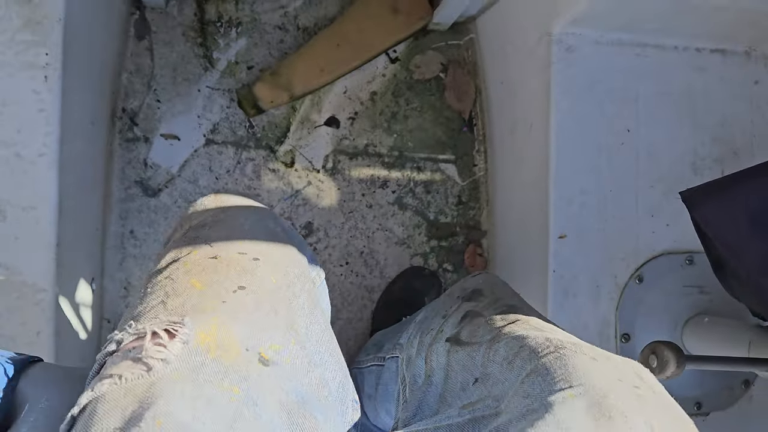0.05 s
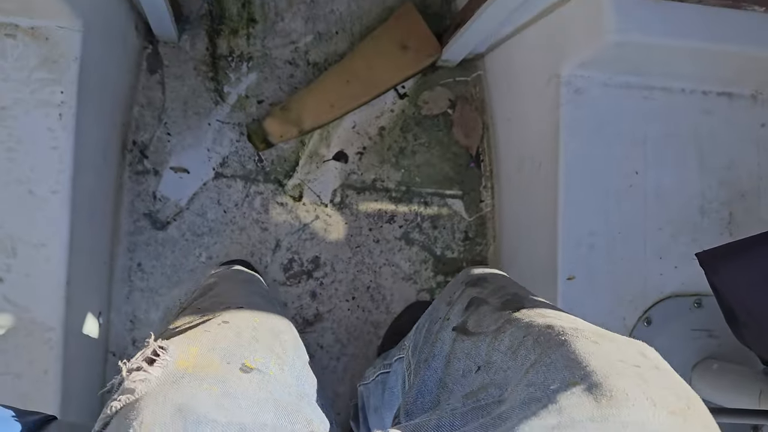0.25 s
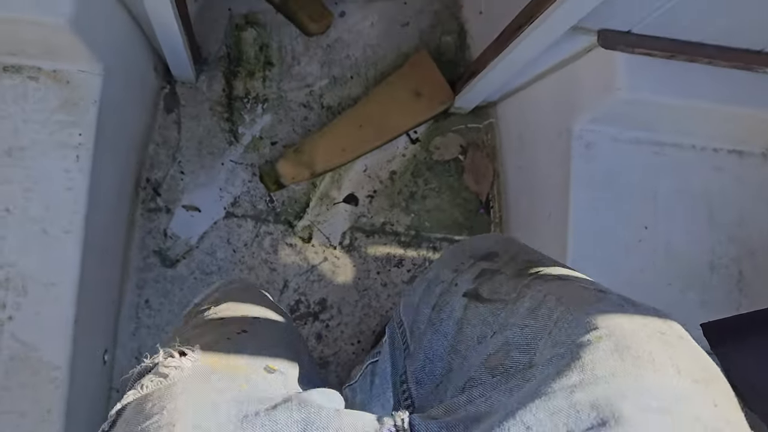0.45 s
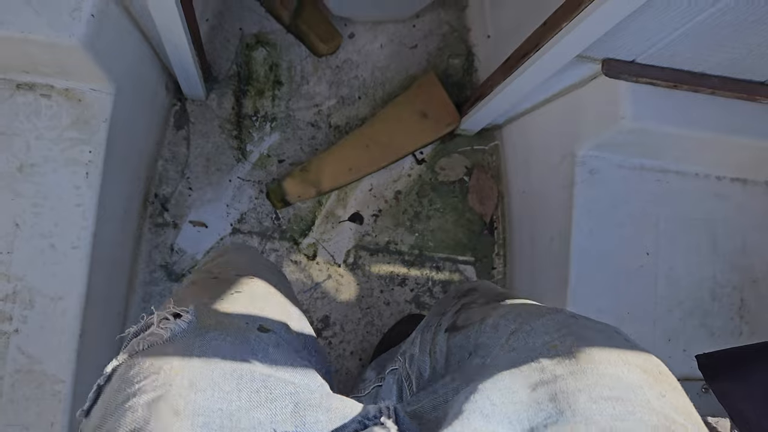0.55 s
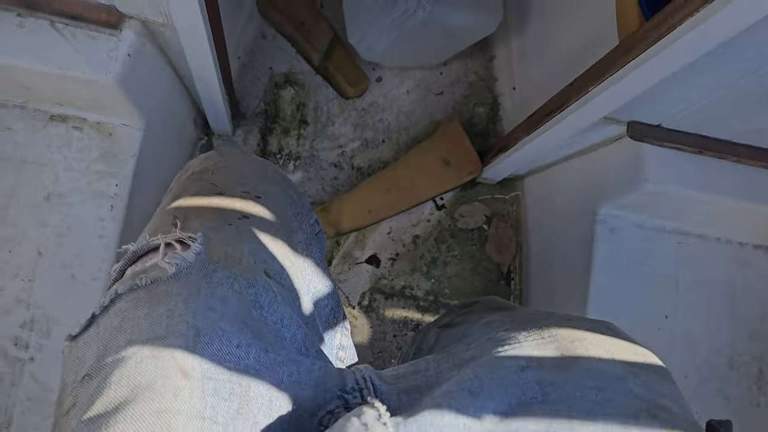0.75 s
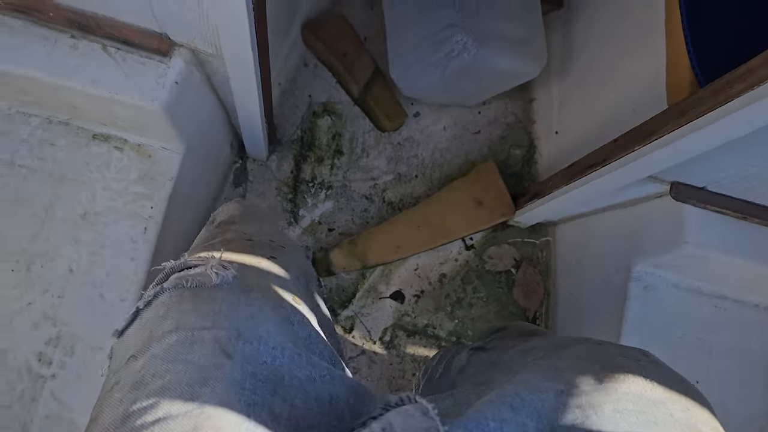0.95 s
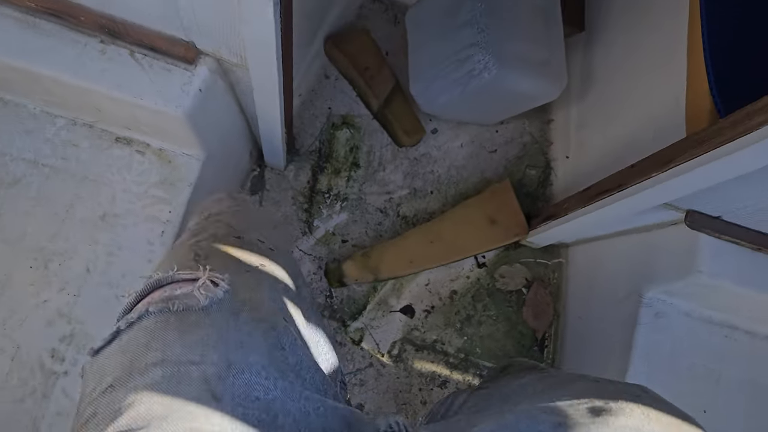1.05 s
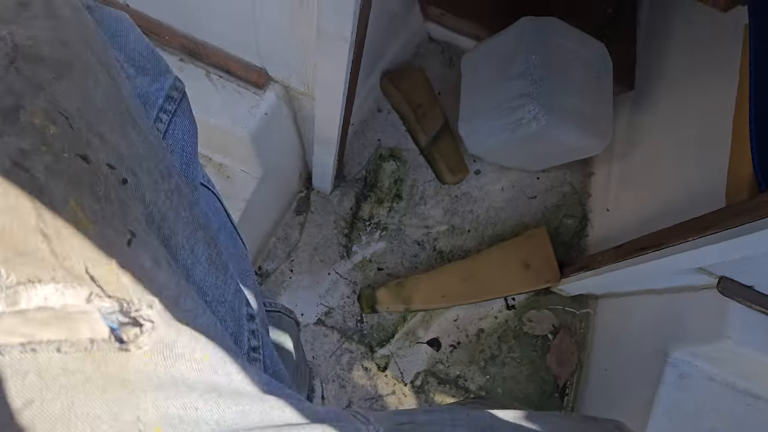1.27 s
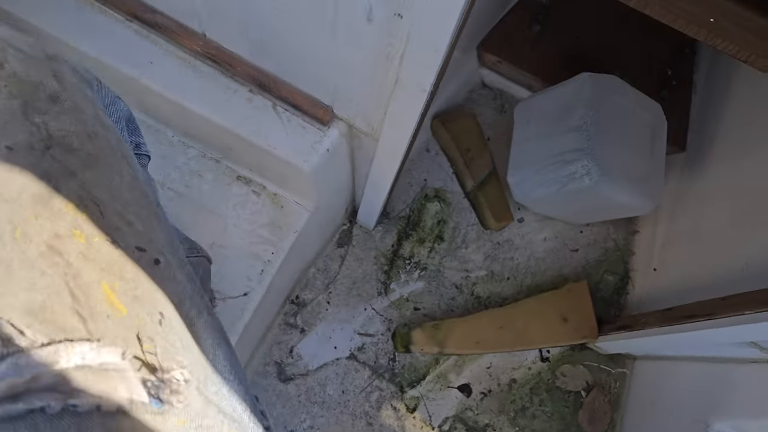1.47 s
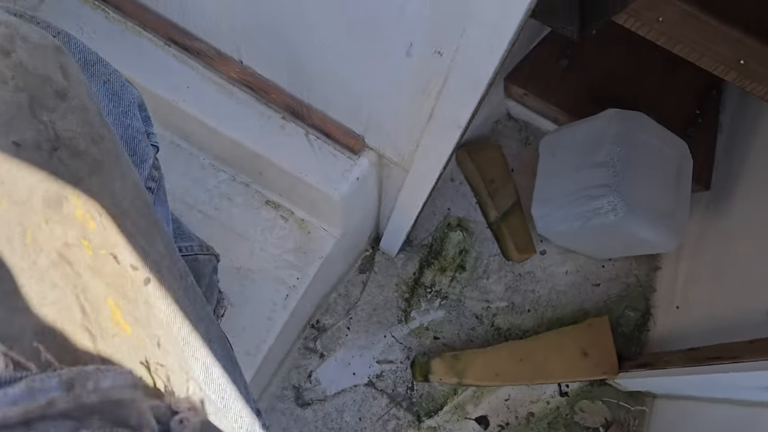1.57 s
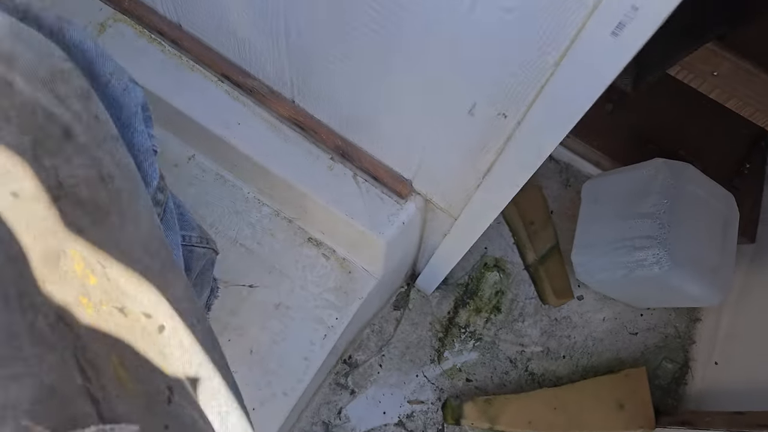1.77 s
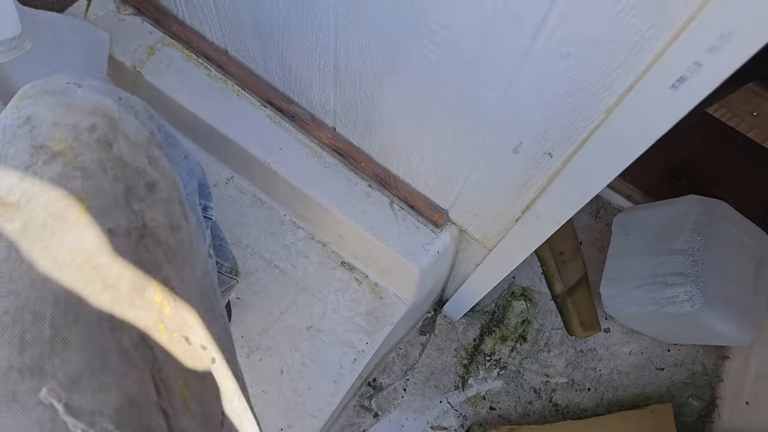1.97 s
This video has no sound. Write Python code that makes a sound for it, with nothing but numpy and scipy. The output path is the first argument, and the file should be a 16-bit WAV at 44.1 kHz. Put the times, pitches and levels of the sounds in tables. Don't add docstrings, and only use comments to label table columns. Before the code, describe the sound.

Five heavy footsteps on a thin, drum-like boat floor outdoors, the first three loudest and evenly spaced, the last two softer after a short gap, with faint cloth rustle and low hull rumble, close stereo microphone slightly overloaded.

```python
import sys
import numpy as np
from scipy import signal
from scipy.fft import rfft, irfft
from scipy.io import wavfile
from scipy.ndimage import uniform_filter1d

SR = 44100
rng = np.random.default_rng(int(sys.argv[2]) if len(sys.argv) > 2 else 0)


def wrap_up_sound(samples):
    columns = np.atleast_2d(samples).T
    tamed = np.clip(columns, -1, 1)
    steps = np.round(tamed * 32767).astype(np.int16)
    wavfile.write(sys.argv[1], SR, steps)


def magnitude_from_level(level_db):
    exponent = np.asarray(level_db, float) / 20
    return 10 ** exponent


N = 88817


def evened(x):
    return x / np.sqrt(np.mean(x ** 2) + 1e-20)


def read_curve(points, hz):
    point_hz, value = np.transpose(points)
    return np.interp(np.log(hz + 1), np.log(point_hz + 1), value)


def add(mix, start_s, sound):
    part = mix[..., round(start_s * SR):][..., :sound.shape[-1]]
    part += sound[..., :part.shape[-1]]


def patchy_noise(shape_db, level, patchy_db, flicker_db):
    frames, hz = N // 128 + 6, np.fft.rfftfreq(512, 1 / SR)
    a, b, c, d, patches = rng.standard_normal((frames, 257, 5)).T
    patches = uniform_filter1d(patches, size=5, axis=0)
    patches = evened(uniform_filter1d(patches, size=12, axis=1))
    flicker = evened(uniform_filter1d(rng.standard_normal(frames), size=3))
    gain_db = shape_db(hz)[:, None] + patchy_db * patches + flicker_db * flicker
    spectra = np.array([a + 1j * b, c + 1j * d]) * magnitude_from_level(gain_db)
    sound = signal.istft(spectra, nperseg=512, noverlap=384)[1][:, :N]
    return evened(sound) * level


# start_s, level_db, brightness_db_per_octave, extra_damping_db_per_0.12_s, hollow_ring_db
SOLE_SLAPS = [(.1972, -22.5, 0, 6, -2), (.2022, -23.5, -1, 2, -2), (.211, -25, 0, 11, -4),
              (0.5442, -23.5, 5, 3, 9), (.556, -32, -1.5, -5, 8), (0.9005, -21, -4, 8.5, 4),
              (.9065, -25, -5, 10, -3), (.9105, -24.5, -5, 5, -5), (.919, -30.5, -3, 9, -7),
              (1.487, -28, -3, -6, -9), (1.498, -31, -1.5, -10.5, -11.5), (1.855, -31.5, -3, -2, -4.5),
              (1.868, -38.5, -5, -20, -5), (1.899, -41.5, 7.5, -15, -2)]
# pitch_hz, level_db
SKIN_COLOUR = [(210, -33), (350, -16), (628, -8), (894, -14), (1220, -6), (1760, -3.5), (2870, -7.5),
               (4950, -23), (9000, -37), (11700, -49), (19800, -120)]
# pitch_hz, t60_s
SKIN_RING_TIME = [(350, 0.2), (1000, 0.12), (2000, 0.15), (4000, 0.12), (9000, 0.19)]


def slaps():
    modes = 300
    contact_s, snap_t60_s, snap_db = 0.0008, 0.04, 10
    dent_s, dent_db = 0.001, 3.5
    hollow_hz, hollow_octaves = 1750, 0.55
    out, t = np.zeros((2, N)), np.arange(5000) / SR
    hz = np.geomspace(450, 9000, num=modes) * rng.uniform(0.93, 1.01, modes)
    base_db = read_curve(SKIN_COLOUR, hz) + 10 * np.log10(hz / 1000)
    t60 = read_curve(SKIN_RING_TIME, hz) * rng.uniform(1.0, 1.25, modes)
    luck = rng.standard_normal((len(SOLE_SLAPS), 4, modes))

    decay = magnitude_from_level(-60 * t / t60[:, None])
    phase = 2 * np.pi * np.outer(hz, t)
    cos_modes, sin_modes = decay * np.cos(phase), decay * np.sin(phase)

    snap = (1 + magnitude_from_level(snap_db - 60 * t / snap_t60_s)) * np.minimum(t / contact_s, 1)
    dent = np.sin(np.pi * np.minimum(t / dent_s, 1)) ** 2
    hollow = np.exp(-(np.log2(hz / hollow_hz) / hollow_octaves) ** 2)
    for (start_s, db, tilt, damp_db, hollow_db), spot in zip(SOLE_SLAPS, luck):
        mode_mix = spot * magnitude_from_level(base_db + tilt * np.log2(hz / 1000) + hollow_db * hollow)
        ringing = mode_mix[:2] @ cos_modes + mode_mix[2:] @ sin_modes
        ringing /= np.sqrt((mode_mix ** 2).sum() / 4)
        slap = magnitude_from_level(db - damp_db * t / 0.12) * snap * ringing
        add(out, start_s, slap - magnitude_from_level(db + snap_db + dent_db) * dent)
    return out


# start_s, pitch_hz, level_db, t60_s
SPOT_RINGS = [(.198, 824, -27, .08), (.198, 1222, -18, .06), (.199, 1400, -18, .1), (.2, 1760, -22, .1),
              (.2, 2003, -22, .065), (.199, 2460, -26, .08), (.199, 2900, -23, .09), (.199, 4334, -37, .08),
              (.2263, 190, -8, .085), (.2197, 210, -8, .03), (.548, 501, -22, .087), (.547, 1071, -28, .08),
              (.545, 1836, -21, .085), (.545, 2143, -24, .08), (.5446, 1900, -10, .012),
              (.546, 3600, -33, .07), (.545, 2380, -18, .06), (.546, 3063, -29, .076),
              (.545, 4600, -40, .09), (.572, 1600, -34, .07), (.605, 165, -25, .15), (.902, 802, -21, .09),
              (.901, 964, -18, .075), (.901, 1180, -17, .06), (.9006, 2200, -14, .02),
              (.902, 2099, -25, .097), (.902, 2584, -26, .068), (.9235, 170, -3, .085),
              (.9143, 235, -6, .07), (1.488, 501, -19, .097), (1.488, 603, -22, .089),
              (1.487, 870, -24, .09), (1.488, 1400, -27, .1), (1.49, 2094, -32, .11),
              (1.49, 3569, -42, .14), (1.51, 290, -22, .25), (1.591, 1700, -42, .02),
              (1.618, 1200, -44, .02), (1.662, 1150, -41, .02), (1.855, 1950, -24, .04),
              (1.856, 660, -22, .09), (1.858, 1190, -33, .13), (1.8908, 200, -10, .05),
              (1.9083, 195, -13, .12), (1.9, 2460, -37, .08), (1.9, 2810, -37, .065),
              (1.903, 3400, -39, .1), (1.74, 270, -40, .12), (.077, 850, -41, .04)]


def rings():
    build_cycles = 0.6
    out, t = np.zeros((2, N)), np.arange(SR // 4) / SR
    for start_s, hz, db, t60 in SPOT_RINGS:
        phase = 2 * np.pi * hz * t
        envelope = magnitude_from_level(db - 60 * t / t60) * (1 - np.exp(-t * hz / build_cycles))
        add(out, start_s, -envelope * np.array([np.sin(phase), np.cos(phase)]))
    return out


# start_s, pitch_hz, level_db, t60_s
PANEL_THUMPS = [(0.1972, 240, -7, 0.06), (0.252, 165, -24, 0.15), (0.22, 48.5, -8, 0.14),
                (0.1974, 505, -20, 0.11), (0.547, 275, -14.5, 0.14), (.566, 48.1, -2, 0.099),
                (.585, 161, -20.5, 0.26), (0.577, 397.4, -25, 0.14), (0.538, 132, -17, 0.3),
                (.9008, 214.3, -9, 0.1), (.9, 162.7, -4, 0.12), (0.9055, 113.2, -10, 0.25),
                (0.928, 59.46, -17.5, 0.98), (.96, 179.4, -21, .4), (1.489, 360, -14, 0.12),
                (1.49, 210.6, -16, 0.25), (1.50, 87.34, -7.5, 0.38), (1.503, 63.3, -12, 0.69),
                (1.4915, 150.6, -13, 0.3), (1.855, 240, -14, 0.08), (1.857, 410.4, -14, .12),
                (1.862, 128, -7, 0.11), (1.872, 252.1, -23, 0.1), (1.901, 72.9, -15, 0.73),
                (1.928, 173.5, -19, 0.18), (1.951, 350.2, -28.5, 0.14),
                (.544, 1540, -8, 0.018), (.546, 2300, -26, 0.086), (.901, 614, -24, 0.095),
               (.927, 300, -16, 0.08), (.910, 1300, -6.5, 0.025), (.204, 330, -14, .06),
               (.955, 170, -22, 0.1), (0.089, 160, -27, 0.52), (.925, 330, -21, 0.14),
               (1.635, 240, -27.5, 0.17), (.549, 694, -28, 0.13)]


def thumps():
    push_cycles, wobble, wobble_onset_s = 0.24, 0.67, 0.029
    out, t = np.zeros(N), np.arange(SR // 2) / SR
    blows = PANEL_THUMPS
    luck = rng.uniform(-0.99, 1, (len(blows), 3))
    for (start_s, hz, db, t60), (rate, turn, depth) in zip(blows, luck):
        waver = np.sin(2 * np.pi * ((14 + 6 * rate) * t + turn))
        waver *= wobble * np.minimum(t / wobble_onset_s, 1)
        swell = 1 - np.exp(-t * hz / push_cycles)
        envelope = magnitude_from_level(db - 60 * t / t60) * swell * (1 + depth * waver)
        add(out, start_s, -envelope * np.sin(2 * np.pi * hz * t + 2 * waver))
    return np.array([out, np.roll(out, 150)])


# start_s, level_db, t60_s
GRIT_CRUNCHES = [(.002, -66, 0.28), (0.197, -27.5, 0.14), (.33, -56, 0.27), (.545, -29.5, 0.11),
                 (.642, -49.5, 0.041), (0.903, -34.5, 0.17), (0.912, -26, 0.073), (1.486, -34.5, 0.17),
                 (1.527, -31.5, 0.1), (1.59, -50, 0.14), (1.856, -32.5, 0.062), (1.867, -37.5, 0.18),
                 (1.899, -47, 0.16), (1.927, -40, 0.088)]
# pitch_hz, level_db_per_hz
GRIT_COLOUR = [(1760, -55.5), (3000, 1.5), (5040, -4.5), (6000, -11), (7300, -2.5), (8880, -6),
               (10100, -17.5), (11400, -7), (16000, -9.5)]


def grit():
    level, t = np.zeros(N), np.arange(12000) / SR
    for start_s, db, t60 in GRIT_CRUNCHES:
        add(level, start_s, magnitude_from_level(db - 60 * t / t60) * np.minimum(t / 0.00067, 1))

    def shape_db(hz):
        return read_curve(GRIT_COLOUR, hz) - 9 * np.maximum(np.log2(3000 / (hz + 50)), 0)

    return patchy_noise(shape_db, level, patchy_db=0.98, flicker_db=2.3)


# middle_s, length_s, pitch_hz, level_db
SOLE_SLIDES = [
    (0.193, .012, 2850, -51.5),
    (0.538, 0.016, 1750, -46),
    (0.85, 0.07, 1620, -55),
    (1.812, 0.031, 2080, -58.5),
]


def slides():
    out, t = np.zeros((2, N)), np.arange(N) / SR
    hiss = rng.standard_normal((len(SOLE_SLIDES), 2, N))
    for (middle_s, length_s, hz, db), z in zip(SOLE_SLIDES, hiss):
        band = signal.butter(2, [hz * 0.92, hz * 1.08], "band", fs=SR, output="sos")
        whistle = evened(signal.sosfilt(band, z))
        out += magnitude_from_level(db) * whistle * np.exp(-((t - middle_s) / length_s) ** 2)
    return out


# pitch_hz, level_db_per_hz
DENIM_COLOUR = [(530, 6), (900, -10), (1250, -7.5), (1620, -2), (3960, -10.5), (7680, -13.5), (9650, -17.5),
                (12700, -15), (16000, -14.5)]
# time_s, rustle_level_db, brightness_db
LEG_MOVES = [(0, -59, -31), (.1, -60, -2.5), (.35, -53, -4.5), (.47, -64.5, 0.5), (.6, -46.5, -7.5),
             (.72, -69.5, 0.5), (.82, -51.5, -5.5), (1.05, -60.5, -2.5), (1.25, -59, 2.5),
             (1.4, -56.5, 9.5), (1.6, -49.5, -20), (1.72, -63.5, 2), (1.8, -55.5, 5), (2.01, -49, -9)]


def denim():
    time_s, rustle_db, bright_db = np.transpose(LEG_MOVES)
    t = np.arange(N) / SR

    def shape_db(hz):
        return read_curve(DENIM_COLOUR, hz) - 8 * np.maximum(np.log2(900 / (hz + 50)), 0)

    level = magnitude_from_level(np.interp(t, time_s, rustle_db))
    cloth = patchy_noise(shape_db, level, patchy_db=0.51, flicker_db=1.2)
    top = signal.sosfiltfilt(signal.butter(2, 5500, "high", fs=SR, output="sos"), cloth)
    return cloth + top * (magnitude_from_level(np.interp(t, time_s, bright_db)) - 1)


# pitch_hz, level_db_per_hz
RUMBLE_COLOUR = [(12, -43), (20, -2.5), (50, -5), (113, -14), (209, -15.5), (240, -20.5), (555, -28.5),
                 (584, -27.5), (1200, -54), (1560, -77), (2640, -120)]
# time_s, deep_level_db, upper_level_db
HULL_MOVES = [(0, -24, -58), (.12, -38, -54), (0.181, -34.5, -58), (.33, -28, -58), (.49, -44, -61),
              (.7, -29.5, -54.5), (.86, -40.5, -59), (1.07, -33, -55.5), (1.3, -51, -60.5),
              (1.46, -46, -58.5), (1.6, -29.5, -41), (1.8, -39, -59.5), (1.92, -51.5, -44),
              (2.01, -27.5, -44)]


def hull():
    split_hz = 230
    time_s, deep_db, upper_db = np.transpose(HULL_MOVES)
    hz, t = np.fft.rfftfreq(N, 1 / SR), np.arange(N) / SR
    colour_db = read_curve(RUMBLE_COLOUR, hz) - 14 * np.maximum(np.log2((hz + 1) / 1200), 0)
    colour = magnitude_from_level(colour_db) * (hz > 15)
    lumps = magnitude_from_level(2.16 * evened(uniform_filter1d(rng.standard_normal(N), size=1500)))
    spectra = rfft(rng.standard_normal((2, N))) * colour
    deep_share = 1 / (1 + (hz / split_hz) ** 6)
    deep = evened(irfft(spectra * deep_share, N)) * magnitude_from_level(np.interp(t, time_s, deep_db))
    upper = evened(irfft(spectra * (1 - deep_share), N)) * magnitude_from_level(np.interp(t, time_s, upper_db))
    return lumps * (deep + upper)


# pitch_hz, likeness (0 to 1)
PORT_LIKENESS = [(60, .99), (500, 0.9), (2000, 0.62), (5000, 0.25), (14000, 0.34)]
# pitch_hz, left_minus_right_db
PORT_BALANCE = [(60, 1), (180, -2.5), (550, 1), (1650, -6.5), (4970, -0.5), (15000, 1.0)]


def ports(two):
    lag_s = -0.00013
    hz, (a, b) = np.fft.rfftfreq(N, 1 / SR), rfft(two)
    same = np.clip(read_curve(PORT_LIKENESS, hz), 0, 1)
    lean = magnitude_from_level(read_curve(PORT_BALANCE, hz) / 2)
    left = a * np.exp(-2j * np.pi * hz * lag_s) * lean
    right = (same * a + np.sqrt(1 - same ** 2) * b) / lean
    return irfft(np.array([left, right]), N)


def scene():
    steps = slaps() + rings() + thumps() + grit() + slides()
    return ports(steps + denim() + hull())


def low_pass(x):
    return signal.sosfilt(signal.butter(12, 16870, fs=SR, output="sos"), x)


def record(dry):
    ceiling = 1.2
    clipped = ceiling * np.tanh(dry / ceiling)
    edge = signal.firwin(401, 16250, fs=SR)
    mix = signal.oaconvolve(clipped, edge[None], "same")
    return low_pass(mix)


dry = scene()
out = record(dry)
wrap_up_sound(out)
```